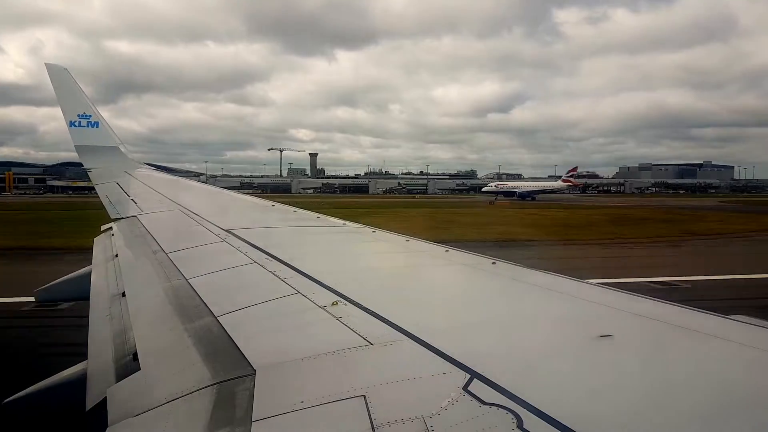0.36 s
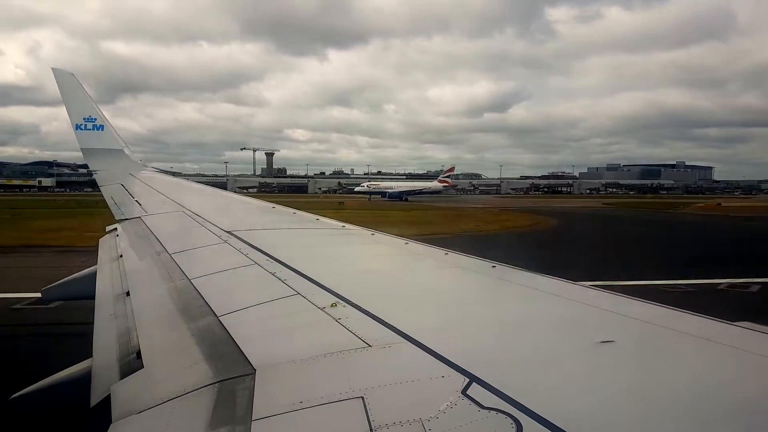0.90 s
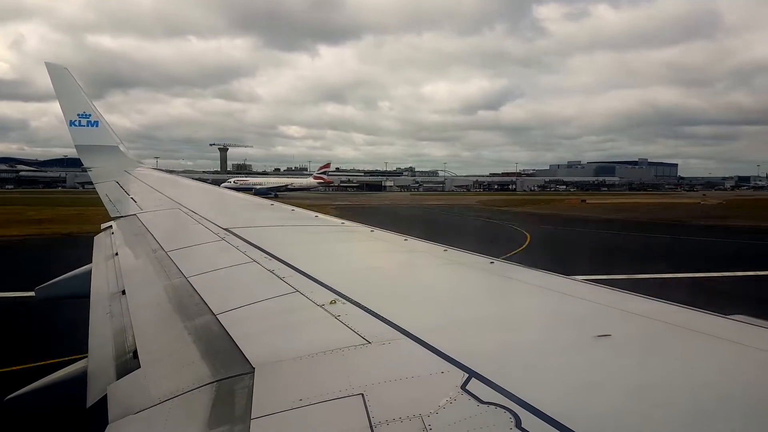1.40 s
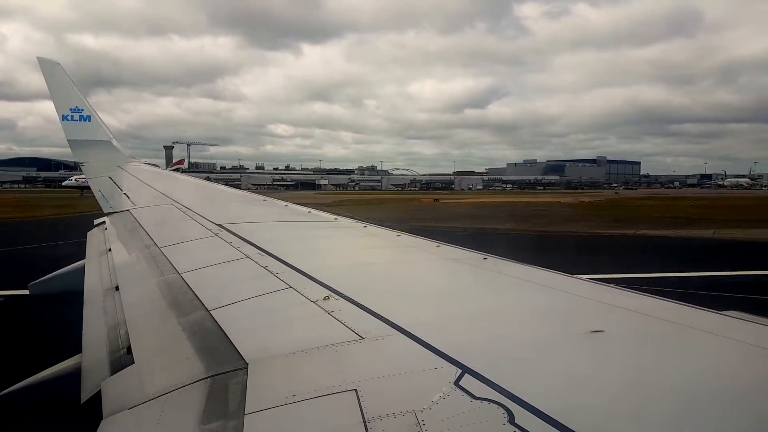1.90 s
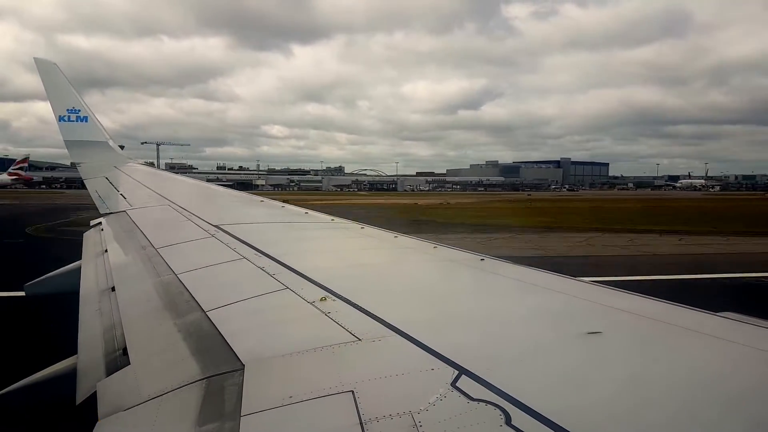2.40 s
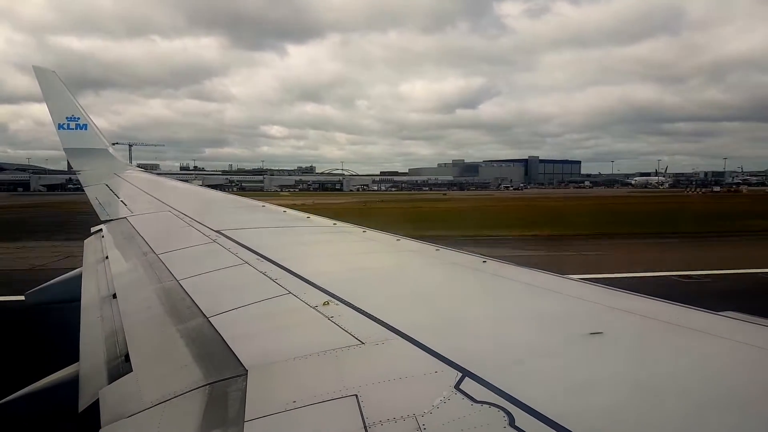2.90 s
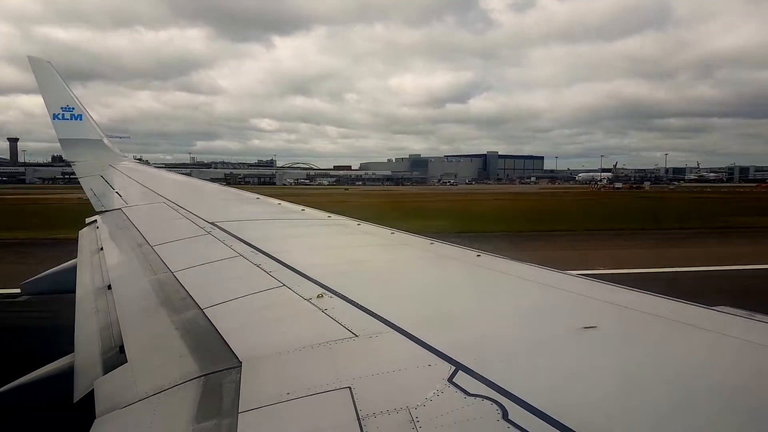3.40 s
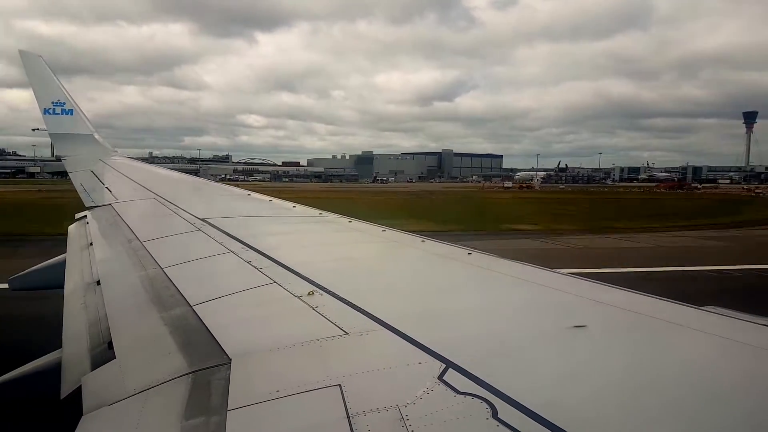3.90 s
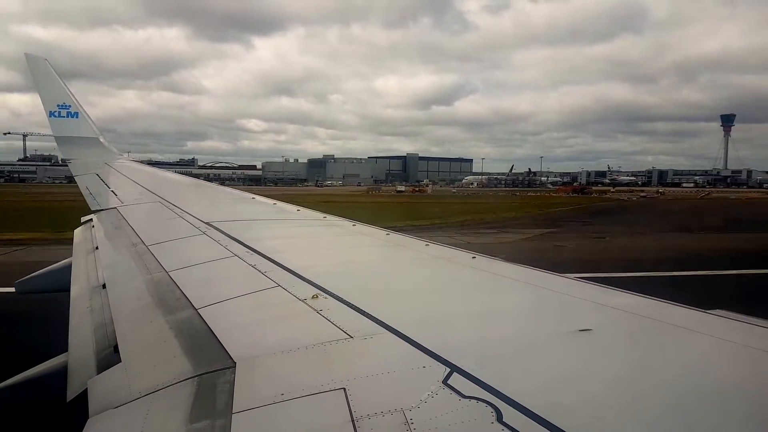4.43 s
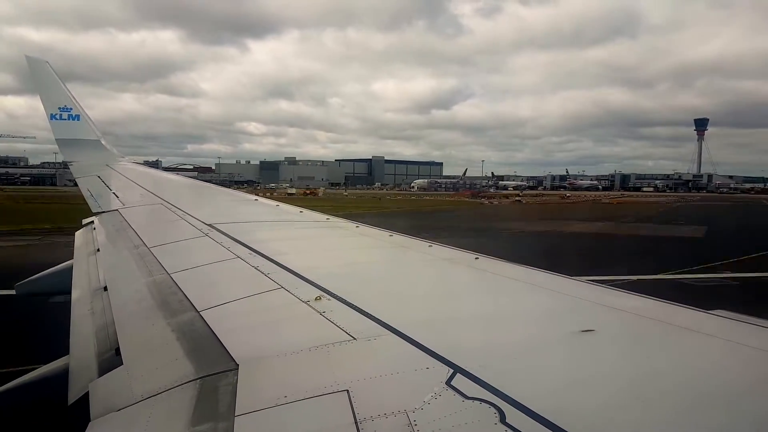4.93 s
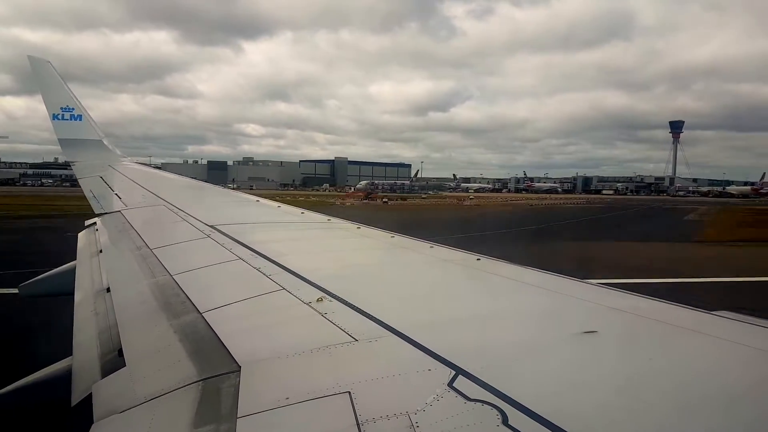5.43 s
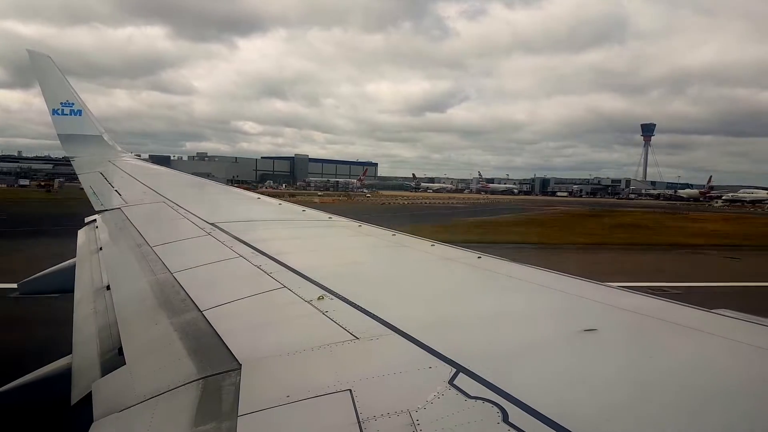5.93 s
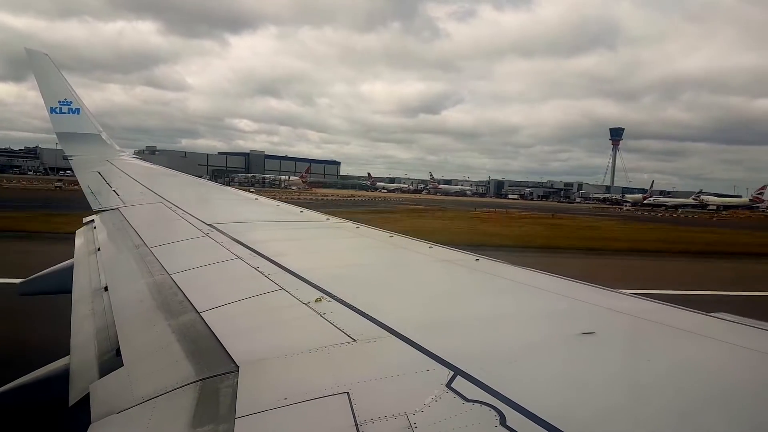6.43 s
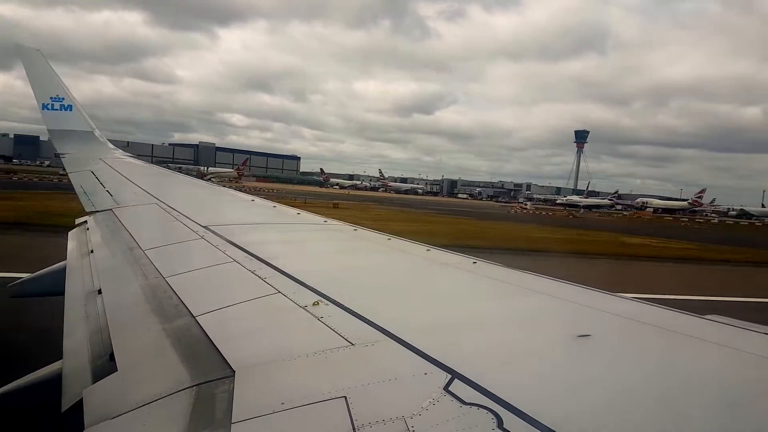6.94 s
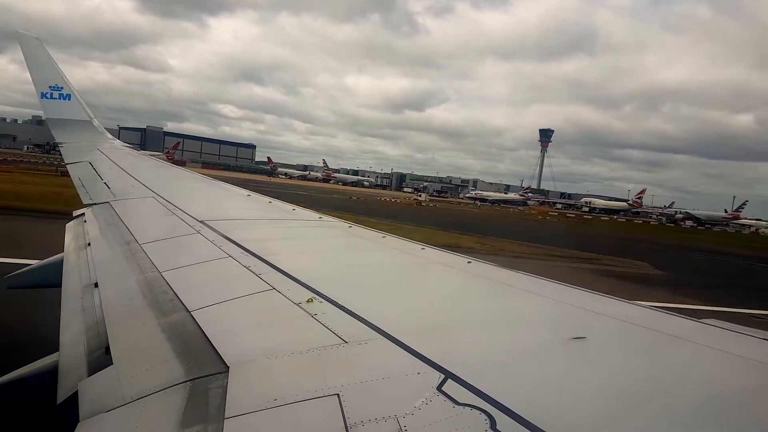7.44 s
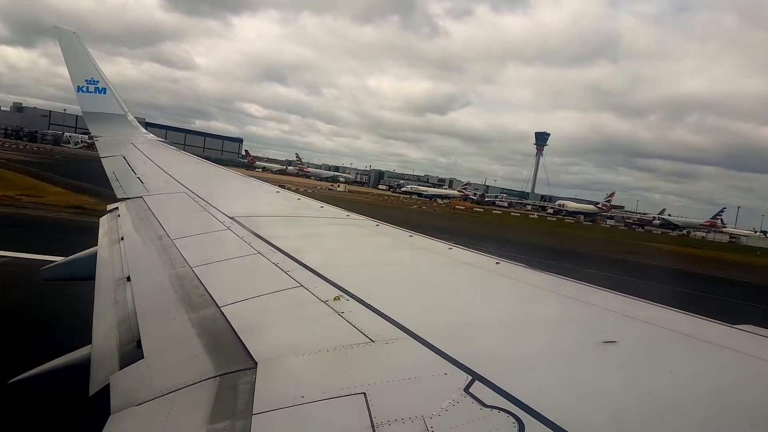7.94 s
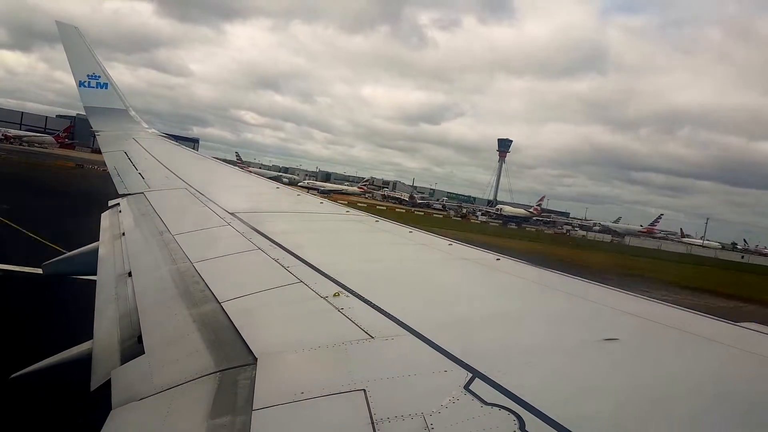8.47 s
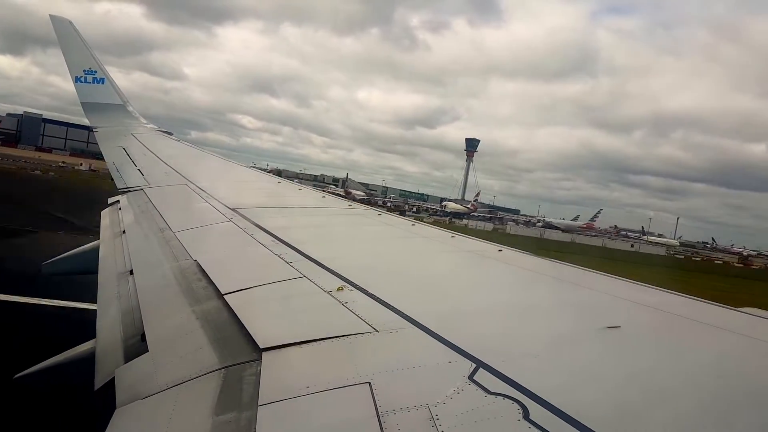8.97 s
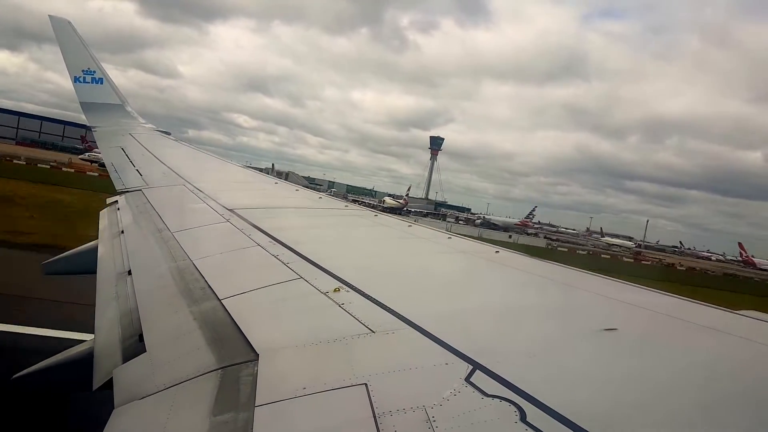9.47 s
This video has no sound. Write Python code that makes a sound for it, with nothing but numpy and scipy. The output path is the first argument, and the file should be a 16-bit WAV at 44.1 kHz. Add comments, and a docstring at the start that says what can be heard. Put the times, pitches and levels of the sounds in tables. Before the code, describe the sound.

From 0 seconds the sound is already at full strength: a loud, continuous jet engine roar heard from a window seat inside an airliner accelerating on the runway. It is broad, dark noise, concentrated in the low end around 60 to 250 hertz, with boomy fuselage resonance and small irregular fluttering. Far beneath it lie a muffled airy hiss, faint cabin rattle and slightly wavering fan and pump tones. Tiny dry ticks from plastic trim scatter throughout, mostly masked. Around 4.5 to 5.2 seconds the roar sags by a few decibels, then quickly returns, with a slightly clearer tick near 5.15. From about 7.7 to 8.4 seconds, ticks cluster with faint short rustles. The roar grows very slightly overall and continues to the end, around 9.5 seconds, without fading. The small stereo camera microphone sounds close, enclosed and compressed, gently rounding off the peaks.

```python
"""Jet exhaust booms through the fuselage on a take-off run heard from a window seat: filtered noise with resonances.
Exhaust hiss leaks through the wall; cabin rattle and microphone floor lie above it, all noise in flickering bands.
Fan and pump tones are faint wandering sines; the trim ticks and rustles as noise bursts ringing its panels.
A small camera with two microphone ports holds the loudest swells down."""
import sys
import numpy as np
from scipy import signal
from scipy.fft import rfft, irfft, next_fast_len
from scipy.io import wavfile
from scipy.ndimage import uniform_filter1d

SR = 44100
rng = np.random.default_rng(int(sys.argv[2]) if len(sys.argv) > 2 else 0)


def decibels_to_gain(level_db):
    """Convert a level in decibels to a linear amplitude gain (20 dB per decade)."""
    exponent = np.asarray(level_db, float) / 20
    return 10 ** exponent


def generate_wav(signal):
    """Clip the signal to [-1, 1] and save it as 16-bit WAV at the path in sys.argv[1]."""
    frames = np.transpose(np.atleast_2d(signal))
    scaled = np.clip(frames, -1, 1) * 32767
    pcm = np.round(scaled).astype(np.int16)
    wavfile.write(sys.argv[1], SR, pcm)


N = 422919
SIZE = next_fast_len(N + SR // 2)
HZ = np.maximum(np.arange(SIZE // 2 + 1) * SR / SIZE, 1)

# Boom spectrum. Each row: frequency in Hz, relative density in dB per Hz.
BOOM_SPECTRUM = [(12, -45), (27, -23.5), (38, -9.5), (65, -5.5), (90, -3.5), (142, -1), (185, -5.5),
                 (240, -10), (339, -15), (538, -25.5), (651, -35), (800, -41.5), (1040, -67), (1760, -120)]
# Fuselage shell resonances. Each row: frequency in Hz, width in Hz, height in dB.
SHELL_RESONANCES = [(102.3, 11, 3.5), (138, 10, 2.5), (157.1, 5.8, 2), (163, 14, 2), (220, 17, 1),
                    (259.7, 21, 3.5), (338, 40, 2.5)]
# Hiss through the wall. Each row: frequency in Hz, relative density in dB per Hz.
HISS_SPECTRUM = [(350, -31), (600, -2.5), (900, -8), (1120, -10.5), (1330, -12.5), (1790, -13.5),
                 (2300, -19.5), (2550, -24), (2700, -22), (2900, -27), (3500, -31), (4250, -42),
                 (7190, -100)]
# Cabin rattle spectrum, with the microphone's own noise floor above 8.5 kHz.
# Each row: frequency in Hz, relative density in dB per Hz.
RATTLE_AND_FLOOR_SPECTRUM = [(2200, -29), (3500, 1), (4200, 0.5), (5300, -1.5), (6000, -3), (7300, -3.5),
                             (8000, -5), (8700, -16), (9500, -17), (12000, -15), (14500, -17), (15600, -16),
                             (17000, -30.5)]
# Noise at the two ports. Each row: frequency in Hz, likeness 0-1, lead of the right in radians,
# left minus right in dB.
PORT_RELATION = [(30, .99, .24, 2.1), (95, .985, .27, .6), (142, .985, .1, .9), (180, .97, -.03, 1),
                 (260, .96, -.02, 1.6), (370, .95, 0, .8), (450, .8, 0, 1.1), (570, .42, 1.0, .5),
                 (720, .42, 2.0, -2.6), (1150, .05, 1.8, -.8), (1450, .16, 4.2, -.8), (1800, .2, 4.3, -4),
                 (2280, .2, 6, -3.2), (3600, .08, 6, -3.3), (7400, .05, 6, -4.8), (9100, .05, 6, -.5),
                 (15000, .05, 6, 0)]
# Level dip of boom, hiss, rattle and floor. Each row: time in seconds, gain in dB.
NOISE_DIP = [(4.45, 0), (4.56, -1.5), (5.15, -3), (5.25, 0)]
# Fan and pump tones. Each row: mean frequency in Hz, mean level in dB, rms wander in Hz, left minus right in dB.
MACHINE_TONES = [(501, -49.5, 1.5, 0), (1003.5, -62, .8, -6), (1053, -63.5, 9, -3), (1494, -64, 6, -4),
                 (1766.5, -63.5, 1.5, -5), (2066, -73, 4, -4), (3533, -77.5, 3, -6)]
# Trim ticks. Each row: start in seconds, relative level in dB, relative level of the bright edge in dB.
TRIM_TICKS = [(1.1477, -45, -22), (1.9224, -50.5, -26), (2.0576, -50.5, -18.5), (2.3254, -50, -26),
              (3.4282, -49, -24), (4.2122, -52, -22), (4.5154, -50.5, -23), (4.9407, -52, -21.5),
              (5.1536, -37, -24), (5.1834, -47.5, -28), (5.437, -52, -19), (5.6084, -44.5, -24.5),
              (5.8368, -49, -21.5), (6.8381, -49.5, -19), (7.7838, -51, -17), (7.8067, -44.5, -20),
              (8.0193, -45, -22), (8.1189, -48, -21), (8.1399, -45, -25.5), (8.1647, -51, -20.5),
              (8.3728, -43.5, -19), (8.8362, -53, -6), (9.0045, -51, -15), (9.1623, -53.5, -10.5)]
# Longer trim rustles. Each row: start in seconds, relative level in dB, relative level of the bright edge in dB,
# 60 dB decay in seconds.
TRIM_RUSTLES = [(7.725, -55, -14, .2), (8.115, -47, -17, .45), (8.315, -57, -11, .2)]
# Trim panel resonances. Each row: frequency in Hz, width in Hz, relative gain in dB.
PANEL_RESONANCES = [(2400, 1000, 2), (3700, 900, -5), (5100, 1000, -2), (7400, 1200, -4), (5500, 6000, -12)]


def level(x, rms_db):
    """Scale to an rms level."""
    return x * decibels_to_gain(rms_db) / np.sqrt(np.mean(x ** 2))


def over_hz(table):
    """Read each column of a table along a log-frequency axis."""
    hz, *columns = np.transpose(table)
    return [np.interp(np.log(HZ), np.log(hz), column) for column in columns]


def resonances(table):
    """Sum of bell-shaped peaks, one for each (Hz, width in Hz, height)."""
    return sum(height / (1 + (2 * (HZ - hz) / width_hz) ** 2) for hz, width_hz, height in table)


def walk(rate_hz):
    """Random levels held 1 / rate_hz and smoothed twice; rms 1."""
    hold = int(SR / rate_hz)
    steps = np.repeat(rng.standard_normal(N // hold + 1), hold)
    smooth = uniform_filter1d(uniform_filter1d(steps, hold), hold)
    return level(smooth[:N], 0)


def port_noise(colour_db, shared_db, flicker_db, rate_hz):
    """Partly alike noise at both ports; half-octave bands flutter together and flicker alone; rms 1."""
    like, lead_rad, pan_db = over_hz(PORT_RELATION)
    like = np.clip(like, 0, 1)
    left, other = rfft(rng.standard_normal((2, SIZE)))
    right = like * np.exp(1j * lead_rad) * left + np.sqrt(1 - like ** 2) * other
    ports = np.array([left, right]) * decibels_to_gain(colour_db + np.array([pan_db, -pan_db]) / 2)

    half_octave = 2 * np.log2(HZ)
    heard = half_octave[colour_db > colour_db.max() - 60]
    flutter_db = shared_db * walk(rate_hz)
    out = 0
    for band in range(int(heard[0]), int(heard[-1]) + 2):
        share = np.cos(np.pi / 2 * np.clip(half_octave - band, -1, 1)) ** 2
        band_noise = irfft(ports * share, SIZE)[:, :N]
        out = out + decibels_to_gain(flutter_db + flicker_db * walk(rate_hz)) * band_noise
    return level(out, 0)


def boom(from_middle_s):
    """Jet exhaust noise coloured by the fuselage shell, rising as the run gathers speed."""
    colour_db = over_hz(BOOM_SPECTRUM)[0] + resonances(SHELL_RESONANCES)
    rise_db_per_s = 0.1
    noise = port_noise(colour_db, shared_db=0.32, flicker_db=0.83, rate_hz=6.0)
    return decibels_to_gain(-11 + rise_db_per_s * from_middle_s) * noise


def hiss(from_middle_s):
    """Exhaust hiss leaking through the wall, rising as the run gathers speed."""
    rise_db_per_s = 0.2
    noise = port_noise(over_hz(HISS_SPECTRUM)[0], shared_db=0.87, flicker_db=0.6, rate_hz=20.0)
    return decibels_to_gain(-40 + rise_db_per_s * from_middle_s) * noise


def rattle_and_floor():
    """Faint cabin rattle, and microphone noise above 8.5 kHz, in bands that flicker around a steady level."""
    colour_db = over_hz(RATTLE_AND_FLOOR_SPECTRUM)[0]
    noise = port_noise(colour_db, shared_db=1.3, flicker_db=0.5, rate_hz=18.0)
    return decibels_to_gain(-63.5) * noise


def tones():
    """Fan blade and pump sines; each wanders in pitch and level, its phase differing between ports."""
    out = 0
    for hz, db, wander_hz, pan_db in MACHINE_TONES:
        phase = 2 * np.pi * np.cumsum(hz + wander_hz * walk(3.0)) / SR
        sides = decibels_to_gain(db + 2 * walk(2.5) + np.array([[pan_db], [-pan_db]]) / 2)
        out = out + np.sqrt(2) * sides * np.sin(phase + 2 * np.pi * rng.random((2, 1)))
    return out


def loose_ticks():
    """Many small ticks at chance times, with evenly spread levels."""
    per_s, least_db, spread_db, least_edge_db = 60.0, -61.0, 7.0, -24.0
    chance = rng.random((1000, 3))
    starts_s = np.cumsum(-np.log(1 - chance[:, 0])) / per_s
    levels_db = least_db + spread_db * chance[:, 1]
    edges_db = least_edge_db + spread_db * chance[:, 2]
    return [row for row in zip(starts_s, levels_db, edges_db) if row[0] < N / SR]


def ticks():
    """Short scrapes of noise ring the trim panels and leave a bright edge; rustles last longer."""
    tick_t60_s, tick_attack_s, rustle_attack_s = 0.022, 0.00084, 0.03
    panel_db, edge_gain_db, panel_pan_db = 5.0, 8.0, -5.5  # pan: left minus right
    rows = [(*row, tick_t60_s, tick_attack_s) for row in [*TRIM_TICKS, *loose_ticks()]]
    rows += [(*row, rustle_attack_s) for row in TRIM_RUSTLES]

    body, edge = np.zeros(SIZE), np.zeros(SIZE)
    age_s = np.arange(SR // 4) / SR
    for start_s, db, edge_db, t60_s, attack_s in rows:
        at = slice(int(start_s * SR), int(start_s * SR) + len(age_s))
        envelope = decibels_to_gain(db - 60 * age_s / t60_s) * np.minimum(age_s / attack_s, 1)
        body[at] += envelope
        edge[at] += envelope * decibels_to_gain(edge_db)

    ring = resonances([(hz, width_hz, decibels_to_gain(db)) for hz, width_hz, db in PANEL_RESONANCES])
    ring = ring * decibels_to_gain([[panel_pan_db / 2], [-panel_pan_db / 2]])
    bright = 1 / (1 + (8500 / HZ) ** 8)  # high-pass, Hz
    scrape = rng.standard_normal((2, 2, SIZE))
    panels = rfft(body * scrape[0]) * ring * decibels_to_gain(panel_db)
    edges = rfft(edge * scrape[1]) * bright * decibels_to_gain(edge_gain_db)
    return irfft(panels + edges, SIZE)[:, :N]


def scene():
    """Boom, hiss, rattle and floor dip together once; tones and ticks join them."""
    t_s = np.arange(N) / SR
    from_middle_s = t_s - t_s[-1] / 2
    noise = boom(from_middle_s) + hiss(from_middle_s) + rattle_and_floor()
    dip_gain = decibels_to_gain(np.interp(t_s, *np.transpose(NOISE_DIP)))
    return dip_gain * noise + tones() + ticks()


def band_limit(x):
    """A steep low-pass at the top of the band."""
    return signal.sosfilt(signal.butter(12, 15760, fs=SR, output="sos"), x)


def record(dry):
    """A quick look-ahead limiter in the camera ducks both ports on each swell; the last peaks round off."""
    window_s, knee_db, squeeze = 0.0077, -8.5, 0.4
    gain_db, ceiling_db, corner = 3.0, 1.3, 6.2
    span = int(window_s * SR)
    power = np.mean(dry ** 2, axis=0)
    power = uniform_filter1d(uniform_filter1d(power, span), span)  # centred, so it looks ahead
    held = dry * decibels_to_gain(gain_db) * (1 + power / decibels_to_gain(2 * knee_db)) ** -squeeze
    rounded = held * (1 + np.abs(held / decibels_to_gain(ceiling_db)) ** corner) ** (-1 / corner)
    return band_limit(rounded)


dry = scene()
out = record(dry)
generate_wav(out)
```